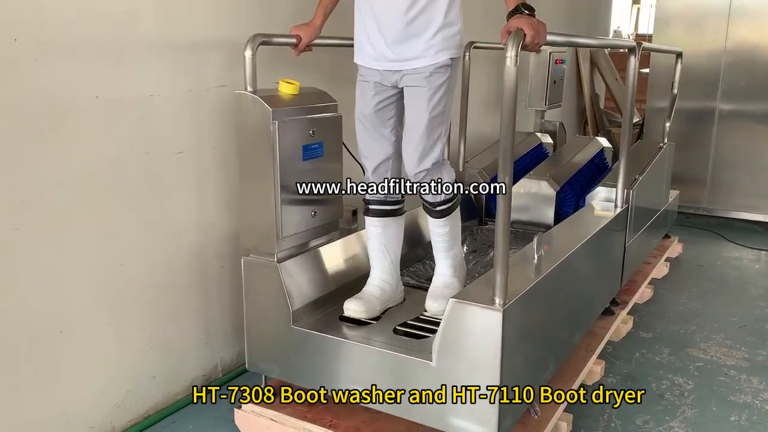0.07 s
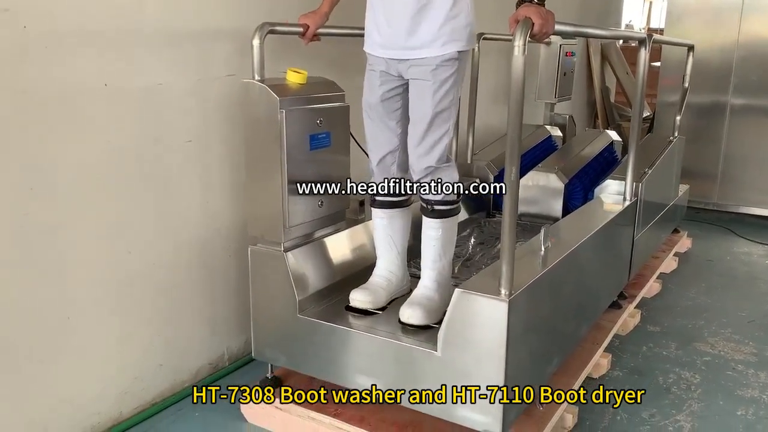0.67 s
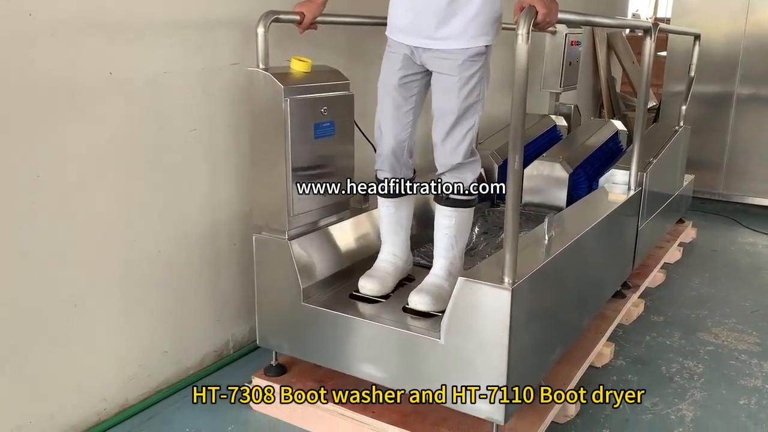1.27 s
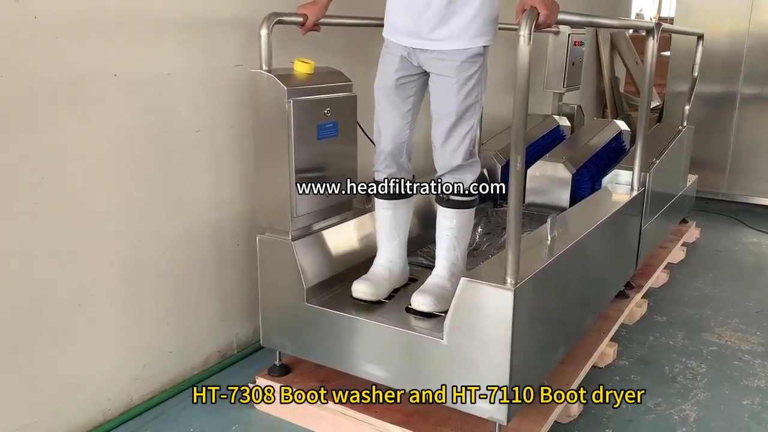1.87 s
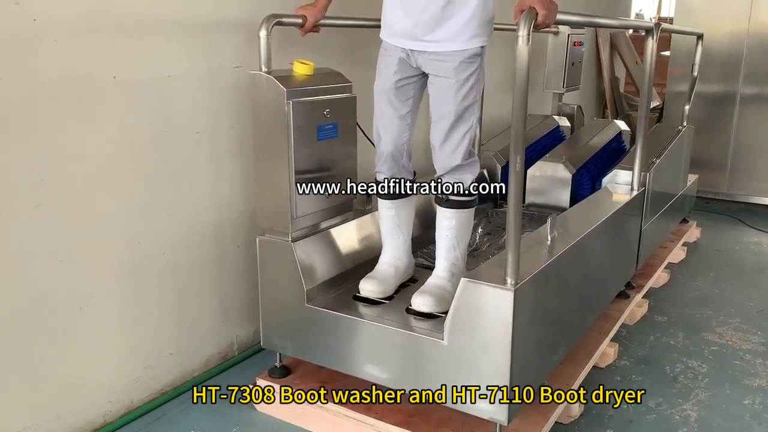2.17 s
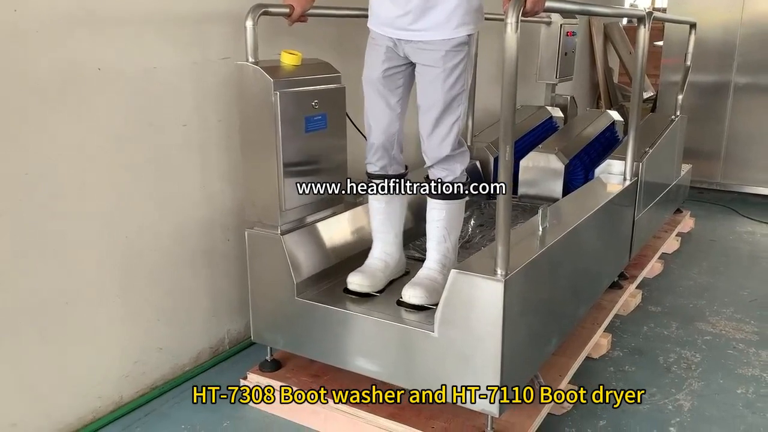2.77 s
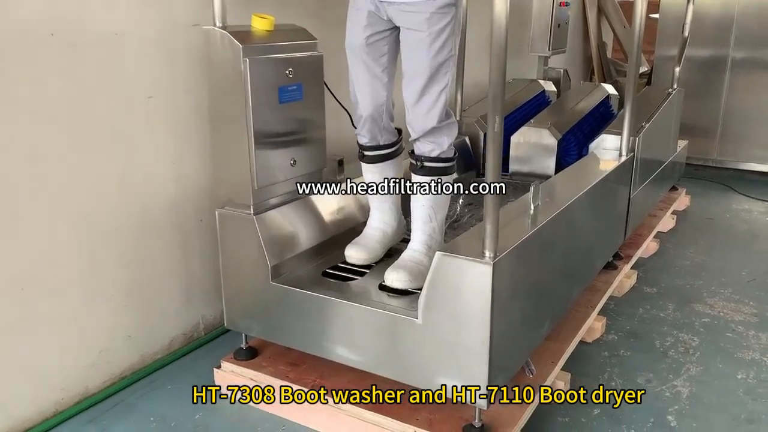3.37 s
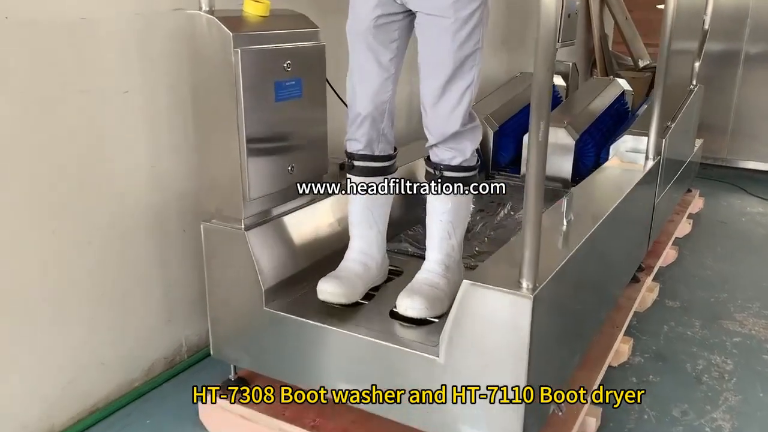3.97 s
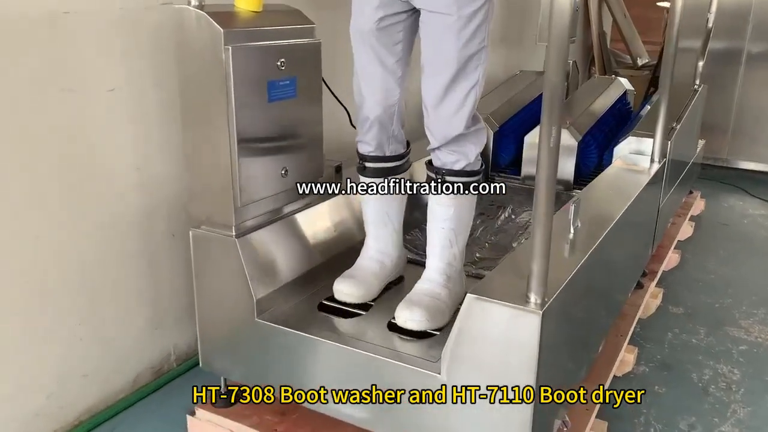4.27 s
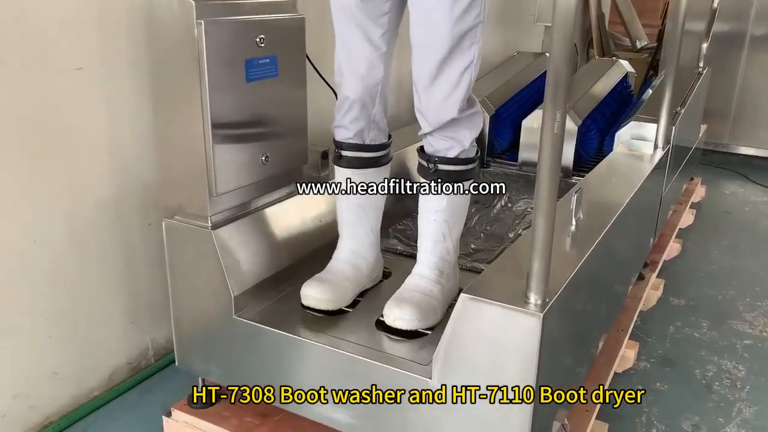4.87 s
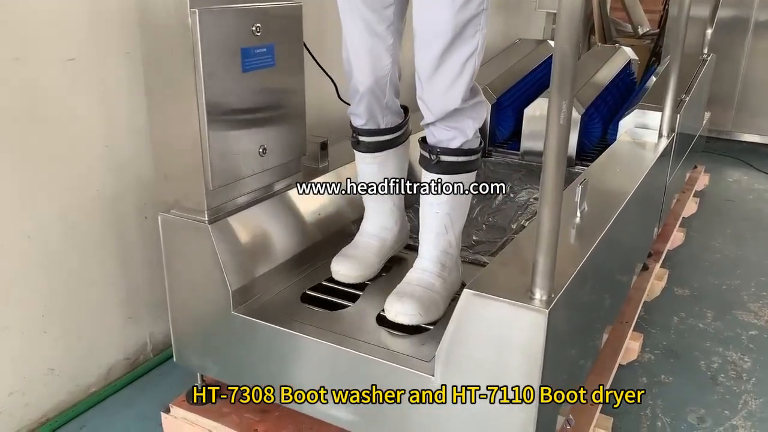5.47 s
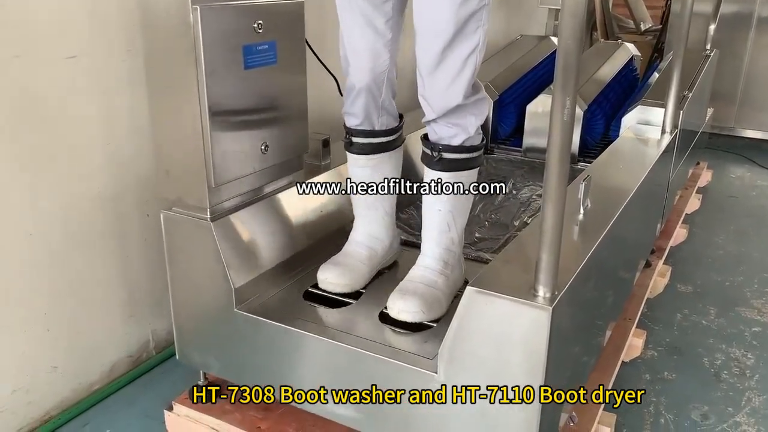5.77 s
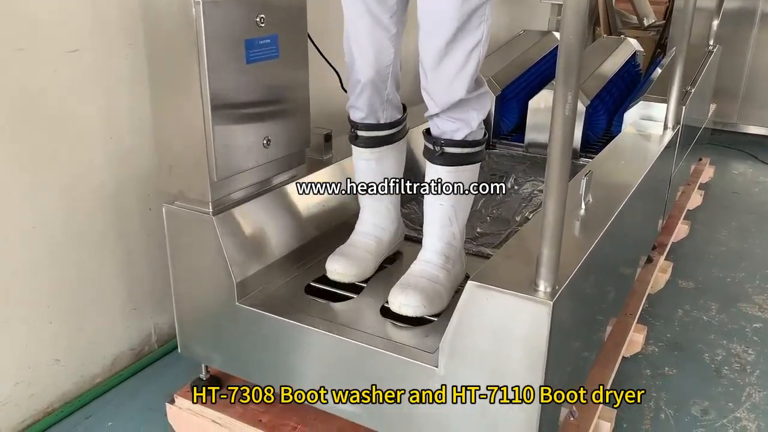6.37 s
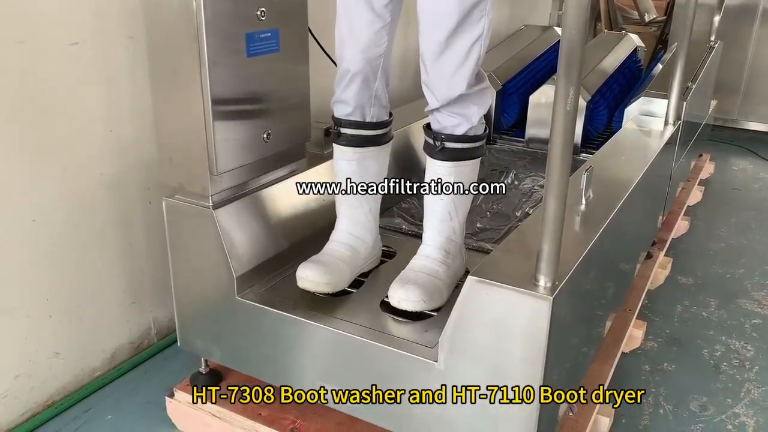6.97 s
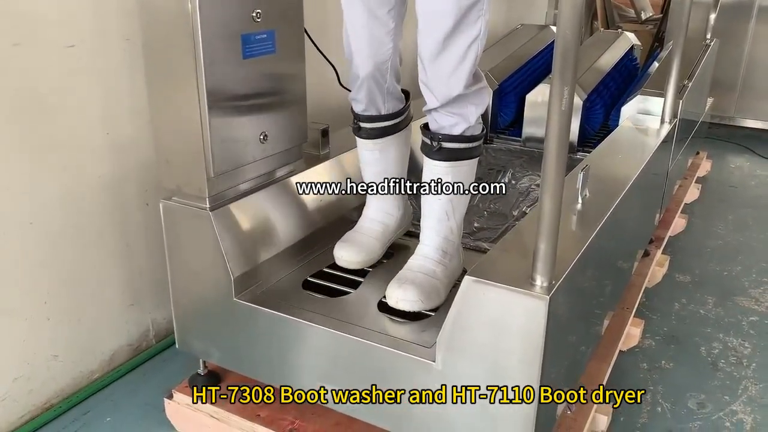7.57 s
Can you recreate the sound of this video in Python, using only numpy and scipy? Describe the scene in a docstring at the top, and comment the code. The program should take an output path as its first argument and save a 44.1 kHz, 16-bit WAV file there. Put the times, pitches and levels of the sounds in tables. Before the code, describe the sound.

Bristles hiss against rubber boots in a droning steel washing machine, with a high bearing squeal coming and going.

```python
"""First you hear a motor's hum, a fan's drone and bristles scrubbing: a steel boot washer in a factory hall.
Rubber boots are drawn over its turning brushes about once a second, and a sole squeaks at the start.
The bristles hiss and set the sheet-metal tub ringing; under a heavy boot its panels groan.
About every two seconds the brush shaft drags and a dry bearing sings.
A hand-held pair of microphones, left and right, slowly moves closer."""
import sys
import numpy as np
from scipy import signal
from scipy.fft import rfft, irfft, next_fast_len
from scipy.io import wavfile
from scipy.ndimage import map_coordinates

SR = 44100
rng = np.random.default_rng(int(sys.argv[2]) if len(sys.argv) > 2 else 0)


def unload_audio(sound):
    """Save the sound as a 16-bit wav file, at the path given as the first command line argument."""
    columns = np.transpose(np.atleast_2d(sound))
    # keep every value between -1 and 1, then stretch to whole-number steps
    steps = np.round(np.clip(columns, -1, 1) * 32767)
    wavfile.write(sys.argv[1], SR, steps.astype(np.int16))


N = 340011
TIME = np.arange(N) / SR

# The direct sound grows as the microphones come closer: time_s, gain_db
APPROACH = [(0, 0), (1.6, 1.7), (3.0, 1.7), (4.3, 3), (5.6, 3.5), (7.7, 3)]
# How the hall's sound reaches the two microphones: frequency_hz, likeness (0 to 1), left_lead_rad
STEREO = [(40, .975, 0), (90, .97, 0), (150, .975, 0), (215, .992, 0), (300, .87, -.05), (375, .88, -.2),
          (405, .65, -.6), (440, .3, -.8), (470, .35, 2.3), (510, .6, 2.2), (560, .68, 1.85),
          (760, .67, 1.3), (980, .8, .9), (1160, .55, 1.8), (1300, .42, 1.7), (1720, .35, 3.1),
          (2000, .2, 3.2), (2170, .35, 5.1), (2350, .38, 4.4), (2500, .22, 5.5), (2700, .3, 3.9),
          (2900, .39, 3.7), (3130, .48, 3.8), (3400, .22, 4.1), (3700, .35, 5.5), (4300, .62, 6.3),
          (5000, .38, 6.9), (5400, .21, 9.1), (6600, .37, 9.7), (7000, .95, 9.4), (7330, .99, 9.4),
          (7600, .85, 9.1), (8100, .53, 8.1), (8400, .73, 6.7), (8800, .998, 6.3), (9650, .998, 6.3),
          (10350, .49, 4.8), (10950, .999, 3.14)]
# Which side is louder: frequency_hz, left_minus_right_db
BALANCE = [(60, 1.6), (110, 1), (190, .3), (340, -1.6), (600, .5), (1070, -.1), (1910, -.9), (3400, -1.1),
           (6060, -1.6), (9000, .3)]
# Pitches at which the sheet-metal tub likes to ring: pitch_hz, width_hz, boost_db
TUB_RESONANCES = [(301, 11.5, 6.5), (335, 14, 3), (365.3, 20, 4.5), (392.7, 16, 7.5), (430, 31, 6),
                  (497, 46, 3.5), (544, 40, 5.5), (925, 28, 4.5), (1015, 24, 5.5), (1242, 63, 7.5),
                  (1377, 91, 4), (1522, 87, 5.5), (1702, 83, 7), (1990, 110, 4), (2043, 50, 2.2),
                  (2150, 130, 3.5), (2348, 116, 4.5), (2640, 88, 4), (2970, 130, 5), (3300, 100, 4.5),
                  (3590, 110, 2.5), (4150, 120, 2.5), (4600, 200, 0.5), (8200, 300, -1.5)]
# A boot is drawn over the brush: start_s, length_s, pressure (0 to 1)
BOOT_STROKES = [(0.108, 0.19, 0.55), (1.243, .5, 0.35), (2.1, .58, 0.6), (3.12, .55, 0.7),
                (4.15, 0.58, 0.6), (5.165, .61, 0.6), (6.19, 0.57, 0.6), (7.2, .6, 0.68)]
# How hard the shaft drags, one number per cycle: force (1 = usual)
DRAG_FORCES = [0.99, 0.75, 1.1, 0.96]

# The low hum, weaker where the microphones pass a standing wave's quiet spot: time_s, relative_db
HUM_LEVEL = [(0, -33), (.45, -32.5), (2.4, -32), (3.55, -33.5), (3.8, -34.5), (5.25, -39), (5.7, -37),
             (6.3, -41.5), (6.65, -37.5), (7.7, -37)]
# The tones in the hum: multiple_of_mains, relative_db, left_minus_right_db
HUM_HARMONICS = [(1, -44, 1), (2, 0, 1.5), (4, -7.5, -0.5), (6, -20, 5)]
# Faint steady tones of the drive: pitch_hz, level_db
DRIVE_TONES = [(92.3, -49), (163.3, -54), (337, -57), (390.7, -66.5)]
# Loudness of the fan blades' tone: time_s, relative_db
FAN_LEVEL = [(0, -31), (.8, -29), (1.1, -32.5), (2.9, -31.5), (3.7, -39.5), (4.12, -34.5), (4.45, -35),
             (5.05, -50), (5.33, -34), (5.8, -39), (6.75, -35), (7.05, -64), (7.2, -28.5), (7.35, -42),
             (7.6, -31)]
# That tone rises a little as the motor is eased: time_s, pitch_hz
FAN_PITCH = [(0, 423.6), (3.0, 423.9), (4.2, 425), (7.71, 425.1)]
# It shifts between left and right as the microphones move: time_s, left_lead_rad
FAN_LEAD = [(0, -.5), (1.2, -.9), (2.7, -.8), (3.3, -1.8), (3.6, .6), (3.9, .4), (4.45, -1.1), (4.8, -.8),
            (5.3, 1.4), (6.3, .8), (6.8, 1.3), (7.7, .5)]

# Loudness of the frame's rumble: time_s, level_db
RUMBLE_LEVEL = [(0, -45), (.7, -38), (1.15, -38.5), (1.8, -37.5), (2.5, -39), (3.25, -38), (4.4, -40),
                (5.3, -38.5), (6.25, -39.5), (7.05, -38.5), (7.55, -37)]
# The rumble's colour (which frequencies are strong in it): frequency_hz, relative_db
RUMBLE_COLOUR = [(15, -26), (32, -28), (42, -30), (52, 2.5), (70, -1.5), (110, -4.5), (150, -3.5),
                 (230, -8), (400, -26), (900, -53)]
# Loudness of the tub's boom: time_s, level_db
BOOM_LEVEL = [(0, -38), (.2, -35), (.5, -36), (.9, -35.5), (1.03, -45), (1.25, -35.5), (1.55, -39),
              (2.2, -37), (2.65, -35), (3.0, -36), (3.15, -39), (3.4, -36), (4.05, -39.5), (4.3, -36.5),
              (4.62, -32.5), (5.0, -34.5), (5.2, -35), (5.45, -34), (5.85, -33.5), (6.0, -37),
              (6.15, -33.5), (6.55, -34), (6.75, -32.5), (6.9, -33.5), (7.25, -33.5), (7.7, -35.5)]
# The boom's hollow colour: frequency_hz, relative_db
BOOM_COLOUR = [(120, -48), (230, -0.5), (300, 6), (420, 1), (520, -4), (750, -19), (1500, -50)]
# Loudness of the housing's ring: time_s, level_db
RING_LEVEL = [(0, -29), (.27, -33), (.38, -38), (.6, -29.5), (.82, -35), (.92, -28), (1.0, -44), (1.8, -39),
              (3.45, -47), (3.68, -35), (3.9, -41), (4.1, -36), (5.5, -35.5), (6.85, -33.5), (7.03, -31.5),
              (7.2, -34.5), (7.7, -36.5)]
# The ring's metallic colour: frequency_hz, relative_db
RING_COLOUR = [(700, -15), (900, 0.5), (980, 0), (1060, 2), (1130, -4.5), (1240, -4), (1360, -4),
               (1700, -39)]

# Loudness of the brushes sweeping the steel deck: time_s, relative_db
SWEEP_LEVEL = [(0, -30), (.48, -29), (.64, -28), (.93, -31), (1.03, -32), (1.62, -35), (2.1, -32.5),
               (3.48, -31.5), (3.7, -30.5), (4.6, -31), (7.05, -31), (7.7, -31)]
# The sweeping's mid-range colour: frequency_hz, relative_db
SWEEP_COLOUR = [(250, -10.5), (450, -7.5), (600, -0.5), (1000, -3), (1450, -6.5), (2000, -9.5), (4000, -16),
                (9000, -54)]
# Loudness of the scrubbing before a boot's pressure is added: time_s, level_db
SCRUB_LEVEL = [(0, -30.5), (.85, -30.5), (1.6, -30.5), (2.1, -30), (2.75, -30), (3.2, -30.5), (4.15, -29),
               (4.4, -29), (4.65, -29.2), (5.0, -28), (5.22, -29), (5.4, -28), (5.9, -27.5), (6.15, -27.5),
               (6.65, -28), (7.1, -28), (7.7, -28.5)]
# The scrubbing's bright colour: frequency_hz, relative_db
SCRUB_COLOUR = [(600, -10), (1300, -19), (1900, -2), (3200, -1), (4200, -5.5), (5300, -6.5), (7300, -9),
                (11000, -44)]
# The very high colour of wet bristle tips: frequency_hz, relative_db
FIZZ_COLOUR = [(1500, -13), (3500, 2.5), (5300, 4), (7400, 12), (8600, 16.5), (9700, 15), (10500, 14.5),
               (11200, 9.5), (11700, 2.5)]
# The hissy colour of bristles sliding along a sole: frequency_hz, relative_db
SWISH_COLOUR = [(2400, -36), (3400, 2.5), (3900, 5.5), (4500, 2), (5200, -0.5), (6500, -26), (9000, -38)]

# A rubber sole squeaks on the steel: start_s, length_s, pitch_hz, level_db
SQUEAKS = [(0, .15, 1685, -39), (.21, .07, 1513, -42.5)]
# The bearing sings, one curve per drag: time_s, relative_db, left_lead_rad, left_minus_right_db
SQUEALS = [
    [(.06, -43, -1, 5), (.13, -37, -1.5, -2), (.25, -36, -4, -4), (.5, -35, -2, 0), (.7, -36, -2.5, 0),
     (.78, -34, -1.5, -3), (.87, -36, -3, 3), (.95, -39, -0.5, 2), (1.06, -36.5, -1.5, -3),
     (1.15, -47, 0, -1)],
    [(2.16, -42, 2, -5), (2.25, -31, 4.5, 1), (2.33, -37, 2.5, 11), (2.42, -36.5, -0.5, 8),
     (2.55, -33, -1.3, 5), (2.7, -35.5, -0.7, 7), (2.85, -33.5, 1, 3), (3.02, -36.5, 0.5, -6),
     (3.07, -44, 1.8, -3), (3.17, -47, -8, -1)],
    [(4.25, -44, -0.45, -2), (4.38, -43, 0.31, -1), (4.53, -44, -1.9, -1), (4.59, -35.5, -1.4, -3),
     (4.72, -33, -1.1, -4), (4.78, -40, -1, 0), (4.86, -38, -0.99, -1), (4.95, -34, -0.44, -2),
     (5.02, -38, -.3, -2), (5.11, -35.5, 0.36, -3)],
    [(6.32, -45, 3, -1), (6.42, -36, 0.5, -2), (6.53, -45, 3.5, -2), (6.66, -38, -1.5, 3), (6.8, -57, 8, 1),
     (6.96, -36, 1, 1), (7.07, -42, 5, 0), (7.18, -33.5, 1, 1)],
]
# The bearing's dry rasp under its song: start_s, length_s, level_db
RASPS = [(0.027, 0.89, -37.5), (2.105, 1.15, -39), (4.5, .55, -74), (6.27, 0.82, -39)]
# That rasp's narrow colour: frequency_hz, relative_db
RASP_COLOUR = [(2100, -2.5), (2540, 4), (2650, 4.5), (2760, 6), (2900, 4), (3200, -25), (4200, -40)]
# One panel of the tub groans: start_s, length_s, pitch_hz, level_db
GROANS = [(0.405, 0.094, 299, -37.5), (0.46, .13, 366, -38), (4.216, 0.11, 393, -35),
          (4.55, 0.13, 316, -37), (4.82, 0.082, 322, -39), (5.05, 0.074, 389, -42), (5.28, 0.049, 309, -39),
          (6.237, .13, 306, -33.5), (6.377, .11, 338, -36), (6.66, 0.105, 393, -37),
          (6.947, 0.097, 304, -34)]
# Tufts of bristles bite into the tread: start_s, length_s, centre_hz, level_db
BITES = [(4.24, 0.084, 3400, -37), (5.04, 0.072, 3520, -36.5), (5.296, 0.064, 3600, -34),
         (5.7, 0.16, 2150, -32), (6.3, .15, 3800, -40), (6.45, .1, 2250, -34), (6.613, .14, 3720, -34)]
# The colour of one bite: distance_from_centre_octaves, relative_db
BITE_COLOUR = [(-1, -36), (-0.028, 5), (-0.82, -2), (0.17, -4), (1.2, -36)]


def gain_of(db):
    """Turns decibels into a number to multiply a sound by."""
    return 10 ** (np.asarray(db) / 20)


def unit_level(x):
    """Scales a signal so that its average size (rms) is 1."""
    return x / np.sqrt(np.mean(x ** 2) + 1e-20)


def follow(rows, column=1):
    """Joins a table's points in time with straight lines, giving a value for every sample."""
    columns = np.transpose(rows)
    return np.interp(TIME, columns[0], columns[column])


def look_up(rows, hz, column=1):
    """Reads a table between its frequencies, spaced as the ear hears them (logarithmically)."""
    columns = np.transpose(rows)
    return np.interp(np.log(hz + 1), np.log(columns[0] + 1), columns[column])


def wander(rate_hz):
    """A random wobble of average size 1 that moves up to about the given rate."""
    steps_per_s, steps = 400, 4096
    hz = np.fft.rfftfreq(steps, 1 / steps_per_s)
    slow = irfft(rfft(rng.standard_normal(steps)) / (1 + (hz / rate_hz) ** 2))
    return unit_level(np.interp(TIME, np.arange(steps) / steps_per_s, slow))


def swell(start_s, length_s, rise_s, fall_s):
    """Fades in from 0 towards 1, then fades out once the length is over."""
    ramp = np.minimum((TIME - start_s) / rise_s, 1 - (TIME - start_s - length_s) / fall_s)
    return np.sin(np.pi / 2 * np.clip(ramp, 0, 1)) ** 2


def tone(hz, lead_rad=0, balance_db=0):
    """A pure stereo tone; the left wave runs ahead by lead_rad and is louder by balance_db."""
    angle = 2 * np.pi * (np.cumsum(hz * np.ones(N)) / SR + rng.random())
    tilt = gain_of(balance_db / 2)
    return np.sqrt(2) * np.array([np.sin(angle) * tilt, np.sin(angle - lead_rad) / tilt])


def flicks(per_s):
    """Two separate showers of tiny bristle clicks of random size."""
    return rng.standard_normal((2, N)) * (rng.random((2, N)) < per_s / SR)


def through_tub(noises, colour, min_likeness=0):
    """Colours two noises, adds the tub's resonances and blends them into left and right at rms 1."""
    size = next_fast_len(N)
    hz = np.fft.rfftfreq(size, 1 / SR)
    tub_db = sum(db / (1 + (2 * (hz - centre) / width) ** 2) for centre, width, db in TUB_RESONANCES)
    left, other = rfft(noises, size) * gain_of(look_up(colour, hz) + tub_db)
    likeness = np.clip(look_up(STEREO, hz), min_likeness, 1)
    right = likeness * left + np.sqrt(1 - likeness ** 2) * other
    right *= np.exp(-1j * look_up(STEREO, hz, column=2))  # the right wave lags behind
    tilt = gain_of(look_up(BALANCE, hz) / 2)
    return unit_level(irfft(np.array([left * tilt, right / tilt]), size)[:, :N])


def pitch_drift(pair):
    """The ringing pitches drift slowly up and down at random, by about 0.8 percent."""
    position = np.cumsum(1 + 0.008 * wander(1.6))
    return np.array([map_coordinates(side, [position], order=3, mode="mirror") for side in pair])


def shimmer(pair, depth_db, life_s, width_hz):
    """Narrow bands of a rustle swell and fade at random, each for a moment."""
    size, hop = 2048, 512
    spectra = signal.stft(pair, nperseg=size, noverlap=size - hop)[2]
    shape = spectra.shape[1:]
    per_hz = np.fft.fftfreq(shape[0], SR / size)[:, None]
    per_s = np.fft.rfftfreq(shape[1], hop / SR)
    # Blurring random dots over frequency and time makes soft loud and quiet patches.
    blur = np.exp(-(per_hz * width_hz) ** 2 - (per_s * life_s) ** 2)
    patches = unit_level(np.fft.irfft2(np.fft.rfft2(rng.standard_normal(shape)) * blur, shape))
    gains = unit_level(gain_of(depth_db * np.minimum(patches, 1)))
    return signal.istft(spectra * gains, nperseg=size, noverlap=size - hop)[1][:, :N]


def shaft_drag():
    """How hard the brush shaft drags; it does so for part of each slow cycle."""
    first_s, every_s = 0.091, 2.055
    return sum(force * swell(first_s + cycle * every_s, length_s=0.87, rise_s=0.05, fall_s=0.05)
               for cycle, force in enumerate(DRAG_FORCES))


def boot_pressure():
    """How hard a boot presses on the bristles at each moment."""
    return sum(pressure * swell(start, length, rise_s=0.125, fall_s=0.09)
               for start, length, pressure in BOOT_STROKES)


def working_db(idle_db, drag_db, press_db, approach_scale=1):
    """A level that rises with shaft drag, boot pressure and the nearness of the microphones."""
    load_db = drag_db * shaft_drag() + press_db * boot_pressure()
    return idle_db + load_db + approach_scale * follow(APPROACH)


def motor():
    """Magnetism makes the motor hum at multiples of the mains frequency; the drive adds faint tones."""
    mains_hz = 50.04 * (1 + 0.00013 * wander(11))
    low_db = follow(HUM_LEVEL) - 0.5  # only the low hum has a standing wave
    high_db = follow(APPROACH) - 37.3
    out = np.zeros((2, N))
    for multiple, db, balance_db in HUM_HARMONICS:
        level_db = db + (low_db if multiple < 3 else high_db)
        out += gain_of(level_db) * tone(multiple * mains_hz, lead_rad=-0.04, balance_db=balance_db)
    for hz, db in DRIVE_TONES:
        level_db = db + 3 * wander(2)
        pitch_hz = hz * (1 + 0.00093 * wander(8))
        out += gain_of(level_db) * tone(pitch_hz, lead_rad=look_up(STEREO, hz, column=2))
    return out


def fan():
    """The spinning blades make a tone that flutters in their own draught."""
    level_db = follow(FAN_LEVEL) - 1.5 + wander(19)
    pitch_hz = follow(FAN_PITCH) + 0.5 * wander(2.3)
    return gain_of(level_db) * tone(pitch_hz, lead_rad=follow(FAN_LEAD), balance_db=-1)


def drive_whine():
    """The drive's thin, unsteady whine grows as the boots load the brushes."""
    level_db = working_db(idle_db=-66.5, drag_db=6, press_db=5) + 2.2 * wander(10)
    pitch_hz = 7650 + 9 * wander(12)
    return gain_of(level_db) * tone(pitch_hz, lead_rad=1.64)


def frame_rumble():
    """The drive shakes the frame, making a deep rumble."""
    return gain_of(follow(RUMBLE_LEVEL)) * through_tub(rng.standard_normal((2, N)), RUMBLE_COLOUR)


def tub_boom():
    """Drag on the brush shaft makes the hollow tub boom."""
    level_db = follow(BOOM_LEVEL) + 0.33 * wander(8.9)
    return gain_of(level_db) * through_tub(rng.standard_normal((2, N)), BOOM_COLOUR)


def housing_ring():
    """Flicking bristles keep the panels of the steel housing ringing."""
    return gain_of(follow(RING_LEVEL)) * pitch_drift(through_tub(flicks(12000), RING_COLOUR))


def brushes():
    """Thousands of bristles flick the deck and soles; their wet tips fizz more when a boot presses."""
    sweep = gain_of(follow(SWEEP_LEVEL) + 2.5) * pitch_drift(through_tub(flicks(12000), SWEEP_COLOUR))
    tufts = wander(26)  # tufts of bristles catch and let go together
    scrub_db = follow(SCRUB_LEVEL) + 1.3 * boot_pressure() + 0.56 * tufts
    scrub = gain_of(scrub_db) * pitch_drift(through_tub(flicks(18000), SCRUB_COLOUR))
    fizz_db = working_db(idle_db=-39.5, drag_db=0.05, press_db=4.4) + 0.41 * tufts
    fizz = gain_of(fizz_db) * through_tub(flicks(26000), FIZZ_COLOUR)
    return (shimmer(sweep, depth_db=5, life_s=0.042, width_hz=52)
            + shimmer(scrub, depth_db=9, life_s=0.054, width_hz=73)
            + shimmer(fizz, depth_db=4.5, life_s=0.068, width_hz=79))


def bristle_swish():
    """Bristles swish along the sole in each stroke, louder once the microphones are near."""
    level_db = working_db(idle_db=-49, drag_db=1.5, press_db=6, approach_scale=2.6) + 0.93 * wander(25)
    return gain_of(level_db) * through_tub(flicks(9000), SWISH_COLOUR, min_likeness=0.72)


def sole_squeaks():
    """Rubber sticks and slips on the deck in short, unsteady squeaks."""
    out = np.zeros((2, N))
    for start, length, hz, db in SQUEAKS:
        loudness = gain_of(db) * swell(start, length, rise_s=0.013, fall_s=0.05)
        out += loudness * tone(hz * (1 + 0.0034 * wander(25)), lead_rad=1)
    return out


def bearing():
    """A dry bearing rasps and sings as the shaft drags; the hall sways its note from side to side."""
    pitch_hz = 2628.5 + 1.6 * wander(18)
    flutter = unit_level(gain_of(1.8 * wander(32)))
    fade_s = 0.048
    song = np.zeros((2, N))
    for squeal in SQUEALS:
        start, end = squeal[0][0], squeal[-1][0]
        fade = swell(start - fade_s, end - start + fade_s, fade_s, fade_s)
        note = tone(pitch_hz, lead_rad=follow(squeal, column=2), balance_db=follow(squeal, column=3))
        song += fade * gain_of(follow(squeal) + 1.5) * note
    rasp_loudness = sum(gain_of(db) * swell(start, length, rise_s=0.031, fall_s=0.15)
                        for start, length, db in RASPS)
    return flutter * song + rasp_loudness * through_tub(rng.standard_normal((2, N)), RASP_COLOUR)


def panel_groans():
    """Under a heavy boot, single panels of the tub swell at their own pitch and die away."""
    out = np.zeros((2, N))
    for start, length, hz, db in GROANS:
        loudness = gain_of(db) * swell(start, length, rise_s=0.06, fall_s=0.065)
        out += loudness * tone(hz * (1 + 0.0059 * wander(11.2)), lead_rad=0.33, balance_db=-1.2)
    return out


def tread_bites():
    """Bristles catch in the boot's tread and rasp harder for a moment."""
    out = np.zeros((2, N))
    clicks = flicks(6500)
    for start, length, centre_hz, db in BITES:
        colour = [(centre_hz * 2 ** octaves, relative_db) for octaves, relative_db in BITE_COLOUR]
        loudness = gain_of(db) * swell(start, length, rise_s=0.019, fall_s=0.073)
        out += loudness * through_tub(clicks, colour)
    return out


def scene():
    """Adds the sounds that run all the time to those that come and go."""
    running = motor() + fan() + drive_whine() + frame_rumble() + tub_boom()
    brushing = housing_ring() + brushes() + bristle_swish()
    return running + brushing + sole_squeaks() + bearing() + panel_groans() + tread_bites()


def record(dry):
    """Cuts away the highest treble, above 11600 Hz."""
    low_pass = signal.firwin(511, 11600, window=("kaiser", 9), fs=SR)
    return signal.oaconvolve(dry, low_pass[None], "same")


dry = scene()
out = record(dry)
unload_audio(out)
```